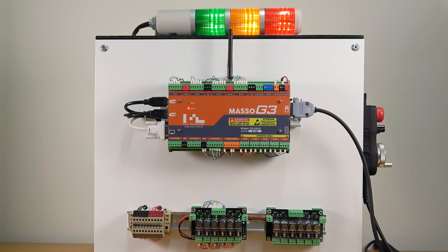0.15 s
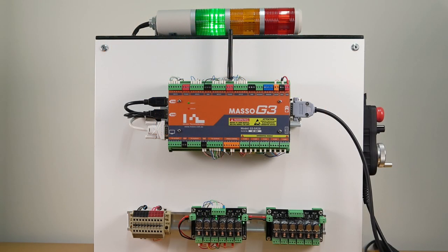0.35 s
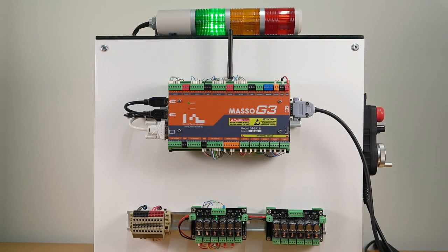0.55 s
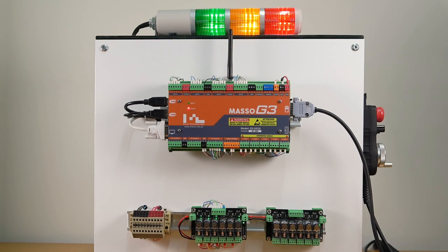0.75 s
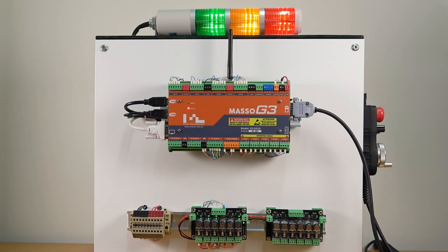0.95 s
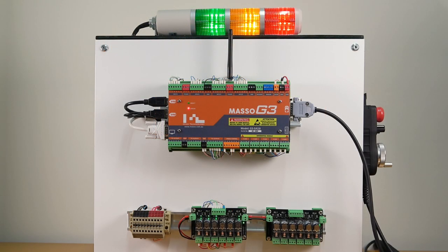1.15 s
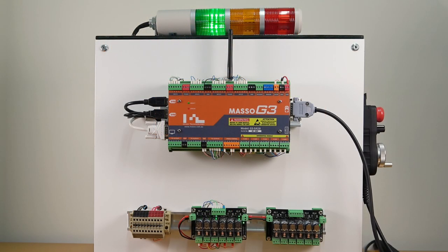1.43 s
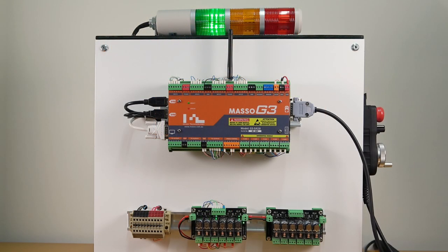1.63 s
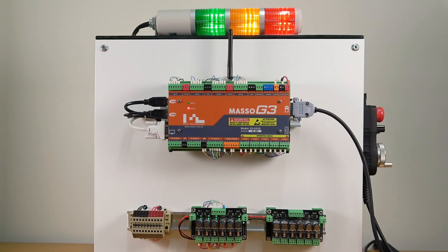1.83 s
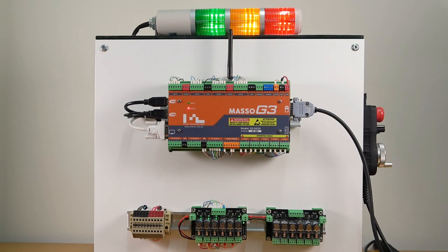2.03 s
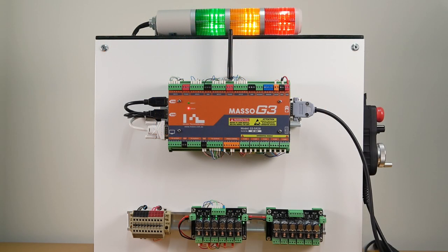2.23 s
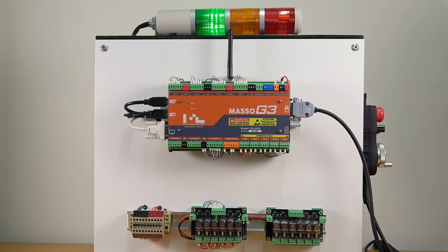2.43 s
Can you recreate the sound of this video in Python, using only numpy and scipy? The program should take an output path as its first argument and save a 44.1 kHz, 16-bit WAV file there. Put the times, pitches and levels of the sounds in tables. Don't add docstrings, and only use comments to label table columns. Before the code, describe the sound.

Small relays switch by turns on a wooden panel, five crisp, slightly chattering clicks about half a second apart, each with a low knock and brief metallic ring, about a metre from the microphone in a quiet workshop.

```python
import sys
import numpy as np
from scipy import signal
from scipy.fft import rfft, irfft
from scipy.io import wavfile

SR = 44100
rng = np.random.default_rng(int(sys.argv[2]) if len(sys.argv) > 2 else 0)


def decibels_to_gain(level_db):
    exponent = np.asarray(level_db, float) / 20
    return 10 ** exponent


def unload_audio(sound):
    columns = np.transpose(np.atleast_2d(sound))
    steps = np.round(np.clip(columns, -1, 1) * 32767)
    wavfile.write(sys.argv[1], SR, steps.astype(np.int16))


N = 114660


def drop_outs():
    # (time [s], level [dB])
    drops = [
        (.2222, 0),
        (1.2705, -.5),
        (2.3183, 0),
    ]
    # (delay [ms], chatter rise [ms])
    delays = [(-2.5, 1.1), (0, 1.1), (2.2, .9), (4.6, .8), (7.9, .5), (11.5, 1.1), (17, 1.5)]
    # (case level [dB], panel level [dB])
    contacts = [(-46, -47.5), (-21.5, -40.5), (-29.5, -42.5), (-24.5, -44.5), (-26, -40.5), (-29.5, -63),
                (-53.5, -53)]
    # (frequency [Hz], level [dB], T60 [s])
    case = [(2620, -17, 0.019), (3430, -16, .02), (4387, -3.5, 0.026), (4689, 3.5, 0.013), (4830, 6, 0.011),
            (5326, -0.5, 0.017), (7106, -3.5, 0.026), (7620, -1.5, 0.0082), (8490, -7, 0.018),
            (9400, -3, 0.0069), (10985, -4, 0.01), (10560, -11, 0.026), (11900, -15.5, 0.015),
            (14700, -22, 0.0055)]
    # (frequency [Hz], level [dB], T60 [s])
    panel = [(46, -13, 0.17), (88, 3, 0.14), (135, -10.5, 0.27), (175.7, 3.5, 0.12), (252, -6, 0.024),
             (835, -14, 0.23), (954, 2, 0.061), (1074, -9, 0.088), (1520, -25, 0.013)]
    # (frequency [Hz], level [dB], T60 [s], first swing [+1 or -1])
    springs = [(341.3, -53, .25, 1), (385.9, -48, .16, -1), (404.5, -35, .07, 1), (462.9, -53, .27, -1),
               (486.4, -47.5, .62, -1), (489.9, -47.5, .64, 1), (508.5, -47, .24, 1), (533.1, -38, .1, 1),
               (556.5, -46, .14, 1), (720.5, -35, .11, 1), (758.8, -43, .1, 1)]
    # (frequency [Hz], level [dB], T60 [s], first swing [+1 or -1])
    blades = [(3560, -52, .38, 1), (3598, -42, .14, -1), (3649, -44, .3, 1), (3672, -53, .33, 1),
              (4565, -56, .25, 1), (4765, -54, .3, -1), (4880, -54, .3, 1), (4960, -56, .3, -1),
              (8455, -51, .17, 1), (9340, -53, .16, 1)]
    # (frequency [Hz], level [dB])
    tail = [(300, -25.5), (1400, -20.5), (2900, -19), (3500, -26), (4800, -18.5), (6200, -24),
            (8800, -12.5), (11500, -20.5), (16000, -40)]
    return relay(drops, delays, contacts, case, panel, springs + blades, .005, tail)


def pull_ins():
    # (time [s], level [dB])
    pulls = [
        (.7794, -1),
        (1.7474, 0),
    ]
    # (delay [ms], chatter rise [ms])
    delays = [(-2.4, 1.1), (0, .65), (8.3, .75), (11.2, .5), (14.5, .9), (20.5, 1.2)]
    # (case level [dB], panel level [dB])
    contacts = [(-57, -71.5), (-31.5, -53), (-22, -31.5), (-22.5, -39), (-33, -41.5), (-49, -50.5)]
    # (frequency [Hz], level [dB], T60 [s])
    case = [(1512, -8, 0.022), (2020, -16, 0.0043), (3010, -14.5, 0.03), (3093, -15.5, 0.019),
            (3840, -3, 0.0061), (4362, 3.5, 0.0082), (4880, 9, 0.0098), (5490, 0.5, 0.017),
            (6260, -7.5, 0.015), (6740, -1, 0.0087), (8020, -7, 0.013), (9300, -4, 0.003),
            (10810, 0.5, 0.0065), (11850, -2.5, 0.0073)]
    # (frequency [Hz], level [dB], T60 [s])
    panel = [(50, -8, 0.046), (105.3, 4, 0.064), (143, -7, 0.11), (178.7, -9, .14), (228, 3.5, 0.038),
             (880, -8, .04), (1000, -14.5, 0.026), (1350, -28, .03)]
    # (frequency [Hz], level [dB], T60 [s], first swing [+1 or -1])
    springs = [(341.5, -60, .32, -1), (390.5, -42, .12, -1), (476.5, -44, .13, -1), (492.7, -46, .18, -1),
               (523.3, -52, .72, 1), (528.5, -57, .3, 1), (541, -44, .23, 1), (560, -32, .095, -1),
               (617.5, -54, .05, -1), (721.9, -44, .1, 1), (762.5, -60, .25, 1)]
    # (frequency [Hz], level [dB], T60 [s], first swing [+1 or -1])
    blades = [(3232, -53, .22, 1), (3420, -58, .3, 1), (3564, -58, .4, -1), (3740, -50, .18, 1),
              (4716, -55, .28, 1), (4870, -56, .3, -1), (4965, -57, .28, 1), (9390, -54, .17, 1),
              (11270, -55, .18, 1)]
    # (frequency [Hz], level [dB])
    tail = [(300, -24.5), (1400, -27.5), (2600, -17.5), (3500, -15.5), (4800, -23.5), (7500, -23.5),
            (11400, -16.5), (13000, -22.5), (16000, -47)]
    return relay(pulls, delays, contacts, case, panel, springs + blades, .0083, tail)


def relay(events, delays, contacts, case, panel, singers, spring_delay_s, tail):
    chatter = contact_chatter(events, delays, contacts)
    push = armature_push(events, delays, contacts)
    pluck = np.zeros(N)
    for start, db in events:
        pluck[int((start + spring_delay_s) * SR)] = decibels_to_gain(db)

    case_sound = convolve(chatter, ring(case, rise_s=0.0001))
    panel_sound = convolve(push, ring(panel, rise_s=0.0041))
    direct = case_sound + contact_crack(chatter) + panel_sound

    far = decibels_to_gain(-19.5) * room_tail(tail)
    boxed = signal.fftconvolve(far, ring(case, rise_s=0.00054))[:len(far)]
    after = far + decibels_to_gain(-27) * boxed + ring(singers, rise_s=.004)
    return direct + convolve(pluck, after)


def contact_chatter(events, delays, contacts):
    habit_share = .9
    t = np.arange(N) / SR
    chatter = np.zeros(N)
    habit = rng.standard_normal(N)
    for start, db in events:
        repeated = np.sqrt(habit_share) * np.roll(habit, int(start * SR))
        grit = repeated + np.sqrt(1 - habit_share) * rng.standard_normal(N)
        for (delay_ms, rise_ms), (case_db, _) in zip(delays, contacts):
            u = np.clip((t - start) * 1000 - delay_ms, 0, 99) / rise_ms
            burst = u * np.exp(-u) / np.sqrt(rise_ms * SR / 4000)
            chatter += grit * decibels_to_gain(db + case_db) * burst
    return chatter


def armature_push(events, delays, contacts):
    push_s = 0.00013
    t = np.arange(N) / SR
    push = np.zeros(N)
    for start, db in events:
        for (delay_ms, _), (_, panel_db) in zip(delays, contacts):
            v = (t - start - delay_ms / 1000) / push_s
            push += decibels_to_gain(db + panel_db) * np.exp(-v ** 2) / (push_s * SR * np.sqrt(np.pi))
    return push


def contact_crack(chatter):
    band = signal.butter(1, [2200, 10700], "band", fs=SR, output="sos")
    return signal.sosfilt(band, chatter) * decibels_to_gain(-2.5) * 10


def ring(modes, rise_s):
    t = np.arange(SR // 2) / SR
    out = np.zeros(len(t))
    for k, (hz, db, t60, *swing) in enumerate(modes):
        direction = swing[0] if swing else (-1) ** k
        out += direction * decibels_to_gain(db - 60 * t / t60) * np.sin(2 * np.pi * hz * t)
    return out * (1 - np.exp(-t / rise_s))


def convolve(force, response):
    return signal.fftconvolve(force, response)[:N]


def room_tail(colour):
    # (frequency [Hz], T60 [s])
    room_t60 = [(100, 0.32), (500, 0.73), (1500, 0.29), (4000, 0.42), (9000, 0.29), (16000, 0.29)]
    onset_s = .008
    t = np.arange(SR // 2) / SR
    out = np.zeros(len(t))
    for hz in 150 * 2 ** (np.arange(28) / 4):
        edges_hz = [hz / 2 ** .125, hz * 2 ** .125]
        band_filter = signal.butter(2, edges_hz, "band", fs=SR, output="sos")
        band = signal.sosfilt(band_filter, rng.standard_normal(len(t)))
        out += band * decibels_to_gain(curve(colour, hz) - 60 * t / curve(room_t60, hz))
    return out * (1 - np.exp(-(t / onset_s) ** 2))


def cloth_rustle():
    # (peak time [s], rise [s], fall [s], level [dB])
    rustles = [
        (.0, .01, 0.077, -66.5),
        (0.102, 0.069, 0.032, -66.5),
        (0.418, 0.18, 0.09, -62.5),
        (2.147, 0.023, 0.13, -64),
        (2.3, 0.025, 0.18, -69.5),
    ]
    # (frequency [Hz], spectral level [dB])
    cloth = [(200, -3.5), (800, 1), (2000, 3), (4500, 0), (8000, -7), (16000, -49)]
    t = np.arange(N) / SR
    swell = np.zeros(N)
    for peak, rise, fall, db in rustles:
        before = np.exp(-((t - peak) / rise) ** 2)
        after = np.exp(-np.abs(t - peak) / fall)
        swell += decibels_to_gain(db) * np.where(t < peak, before, after)
    return swell * coloured_noise(cloth)


def coil_whine():
    # (frequency [Hz], level [dB])
    whine = [(490, -83), (524, -85)]
    t = np.arange(N) / SR
    return sum(decibels_to_gain(db) * np.sin(2 * np.pi * hz * t) for hz, db in whine)


def workshop_hiss():
    # (frequency [Hz], spectral level [dB])
    hiss_colour = [(25, -7.5), (92, -0.5), (400, -12.5), (800, -11.5), (1740, -10), (6000, -12.5),
                   (11000, -18.5), (16000, -24)]
    return decibels_to_gain(-69) * coloured_noise(hiss_colour)


def coloured_noise(colour):
    hz = np.arange(N // 2 + 1) * SR / N
    x = irfft(rfft(rng.standard_normal(N)) * decibels_to_gain(curve(colour, hz)), N)
    return x / np.std(x)


def curve(table, hz):
    points = np.array(table, float)
    return np.interp(np.log(hz + 1), np.log(points[:, 0]), points[:, 1])


def scene():
    switching = drop_outs() + pull_ins()
    background = workshop_hiss() + cloth_rustle() + coil_whine()
    return (switching + background)[None]


def band_limit(x):
    return signal.sosfilt(signal.butter(12, 16800, fs=SR, output="sos"), x)


def record(dry):
    low_pass = signal.ellip(6, .3, 30, 15900, fs=SR, output="sos")
    mix = signal.sosfilt(low_pass, dry)
    return band_limit(mix)


dry = scene()
out = record(dry)
unload_audio(out)
```